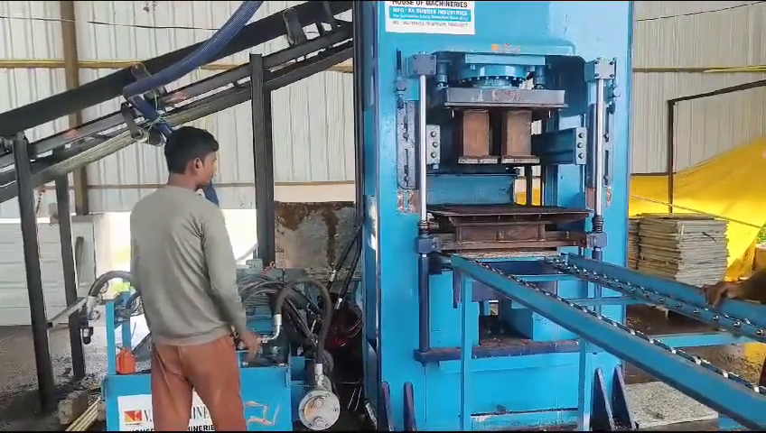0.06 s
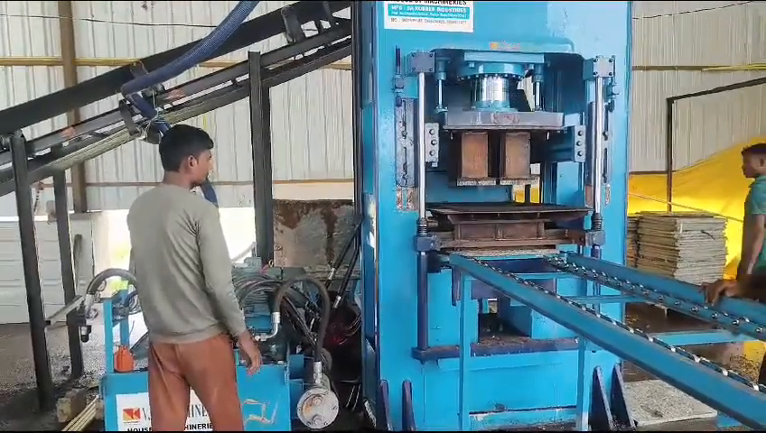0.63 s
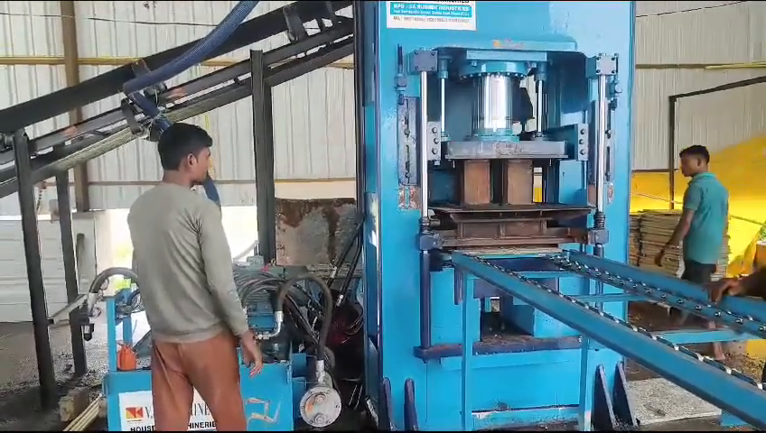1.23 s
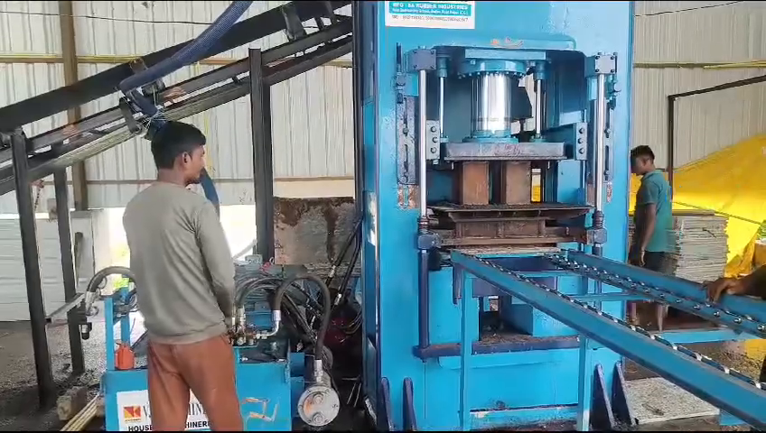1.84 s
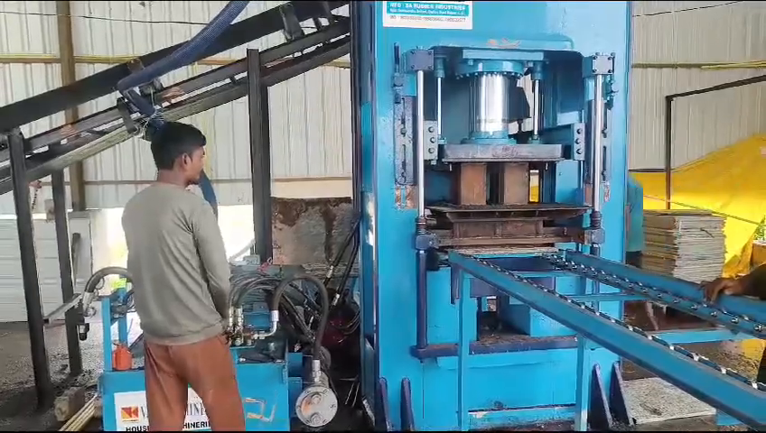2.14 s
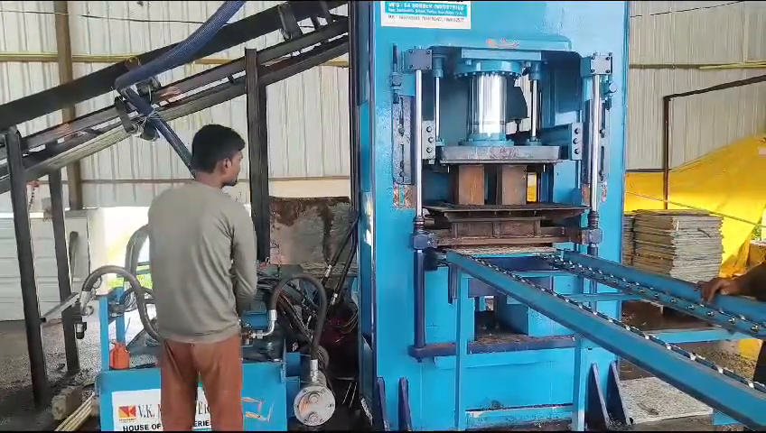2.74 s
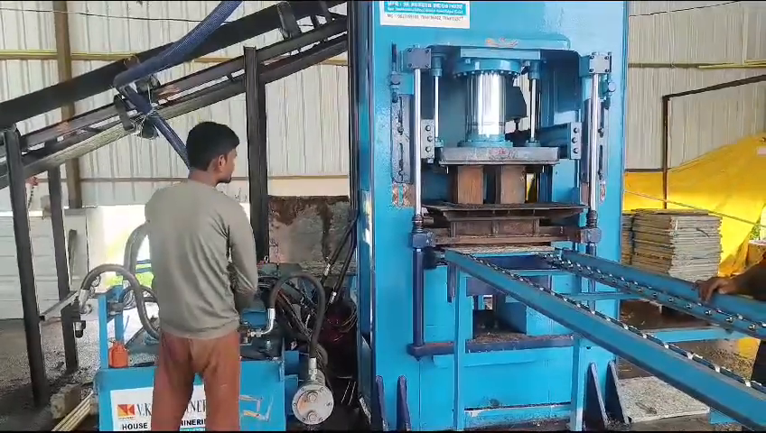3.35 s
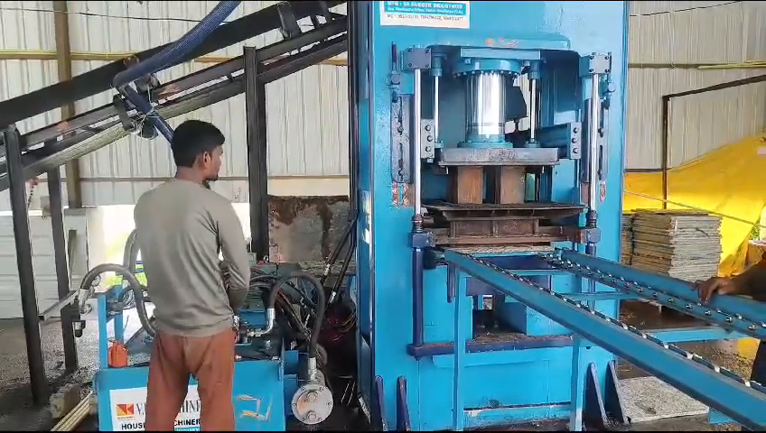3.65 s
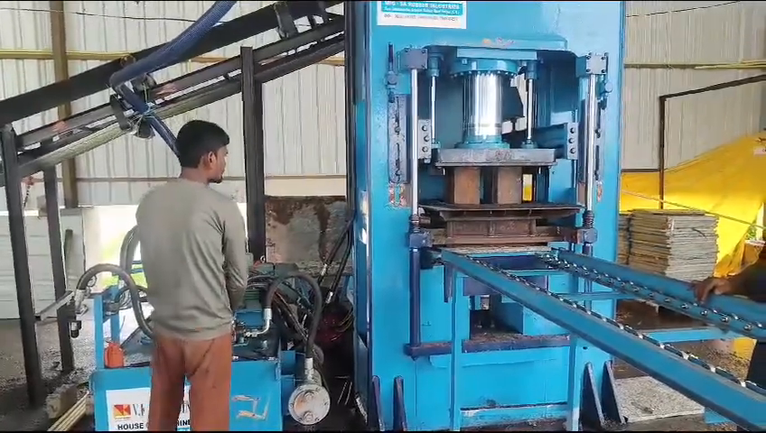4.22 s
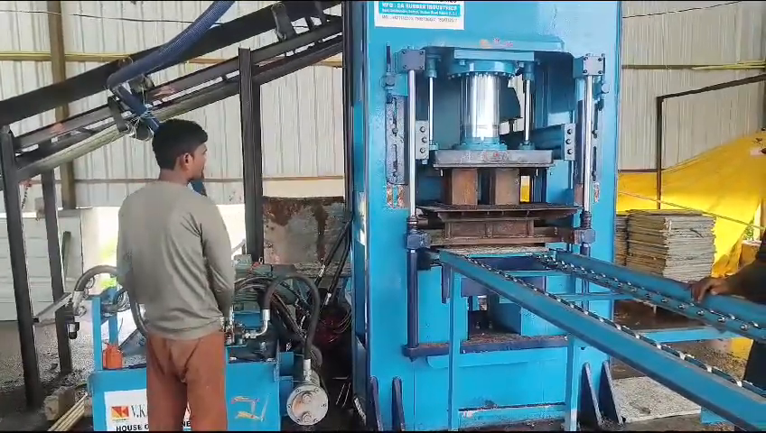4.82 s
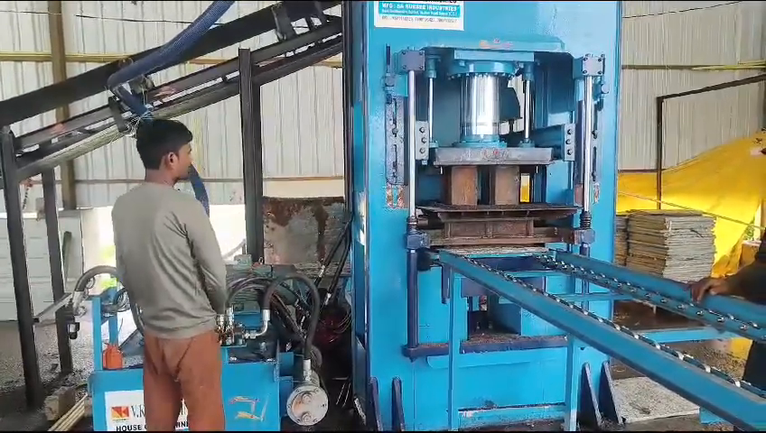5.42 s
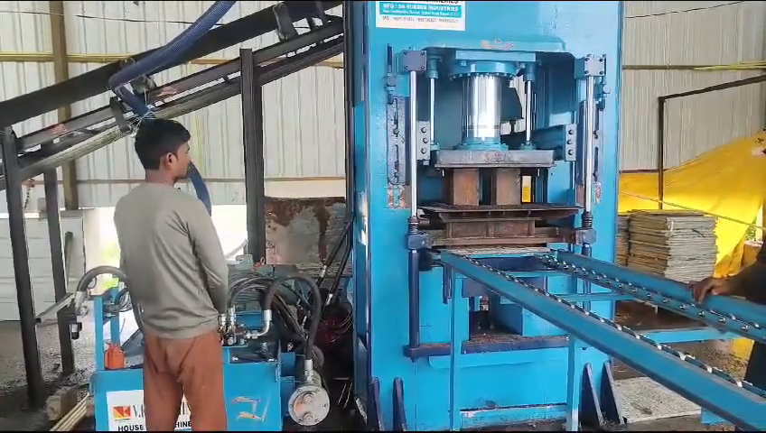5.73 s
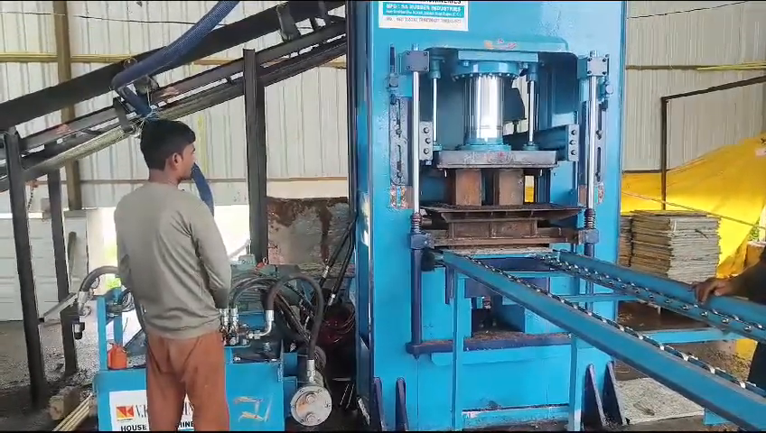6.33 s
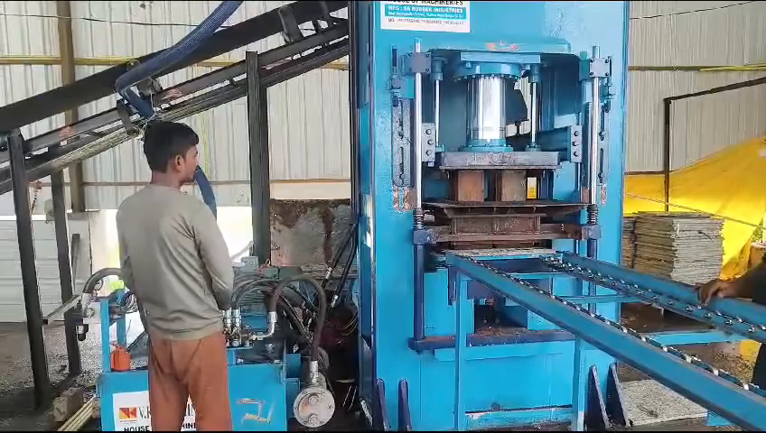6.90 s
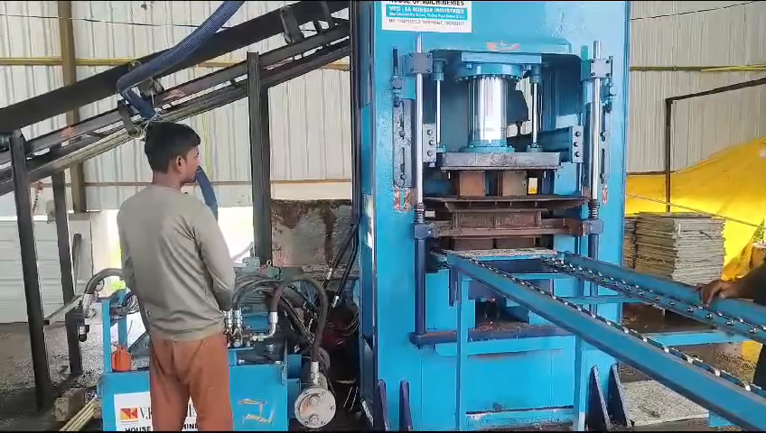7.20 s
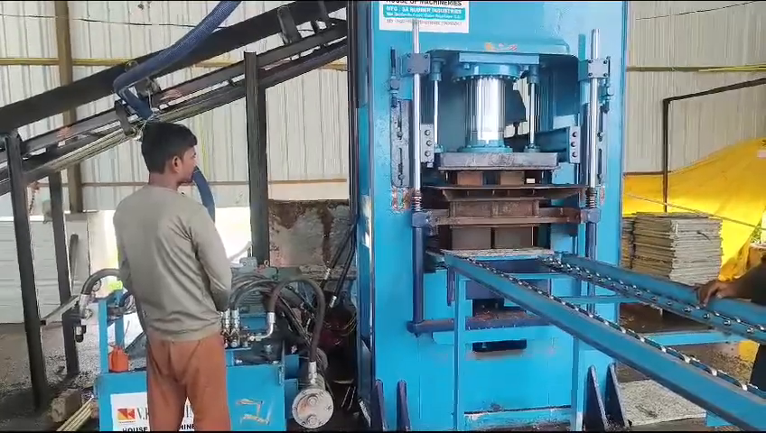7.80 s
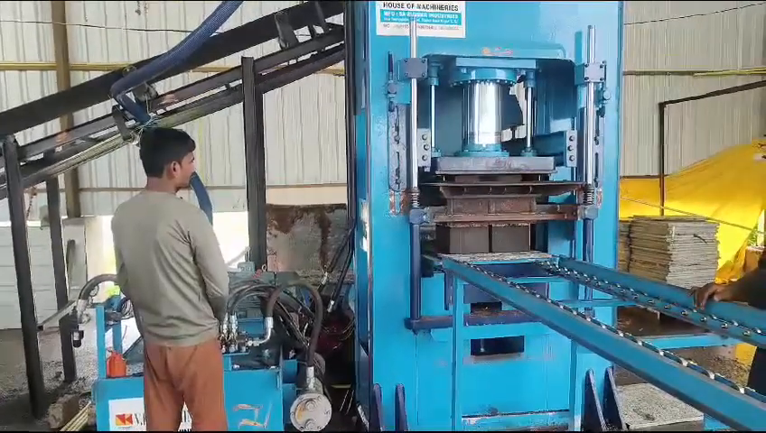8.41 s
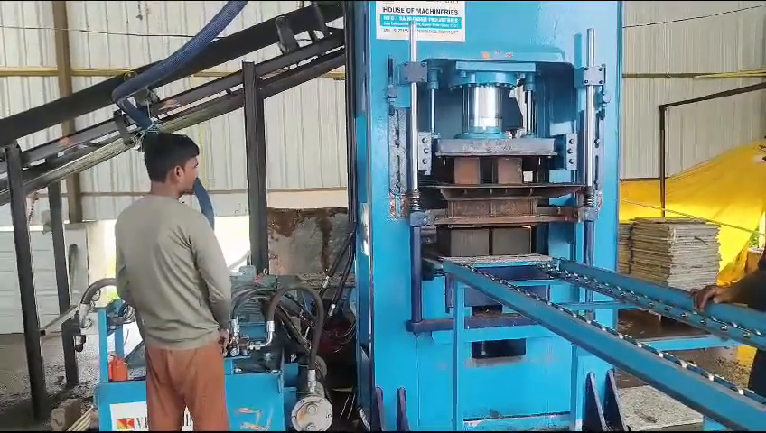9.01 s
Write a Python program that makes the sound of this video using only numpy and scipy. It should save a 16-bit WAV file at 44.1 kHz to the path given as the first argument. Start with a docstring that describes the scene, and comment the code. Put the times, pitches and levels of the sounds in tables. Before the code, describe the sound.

A hydraulic block press drones and rattles, then settles to a pump hum with rushing oil, metal clanks and sharp hammer blows.

```python
"""The vibrating table of a hydraulic block press shakes a steel mould in a sheet-metal shed.
Eccentric weights drive it into a drone and rattle, then coast to rest as the ram groans by stick-slip.
The pump's pistons hum on, and turbulent oil rushes through valves to the rams.
The mould clanks against the frame and sheds grit as it is stripped.
Elsewhere a hammer excites the modes of struck steel, and the walls reflect each blow."""
import sys
import numpy as np
from scipy import signal
from scipy.fft import rfft, irfft, next_fast_len
from scipy.io import wavfile

SR = 44100
rng = np.random.default_rng(int(sys.argv[2]) if len(sys.argv) > 2 else 0)


def unload_wav(signal):
    """Save mono or channel-first audio to the path in sys.argv[1] as 16-bit WAV at rate SR, clipped to [-1, 1]."""
    wavfile.write(
        sys.argv[1],
        SR,
        np.round(np.clip(np.atleast_2d(signal).T, -1, 1) * 32767).astype(np.int16),
    )


N = 403515
T = np.arange(N) / SR

# Levels are relative within each table; a swell's width_s is its standard deviation.
SHED_DECAY = [(60, 0.44), (300, 1), (1000, 0.76), (3000, 1), (6000, 0.84), (15000, 0.33)]  # reverberation time: frequency_hz, t60_s
BLOW_REPEATS = [(0.0135, -3.5), (0.0162, -7), (0.0195, -6.5), (0.044, -10), (0.054, -11), (0.074, -11)]  # repeats of each blow: delay_s, level_db; the first three are the hammer bouncing on the steel, the later ones reflections from near walls
SIDE_GAIN = [(30, -27), (90, -39), (180, -58), (350, -20), (700, -5), (1300, -1.5), (3000, -1)]  # weight of the side signal: frequency_hz, gain_db
EAR_TILT = [(400, 0.5), (700, 1), (1300, 2), (2400, -1), (4400, -7), (8000, 1.5), (15000, -4)]  # left-right contrast, scaled for each ear: frequency_hz, contrast_db
TREBLE_LOSS = [(6400, -1), (7200, -4), (8000, -24), (9300, -9), (10300, -14.5), (11600, -5.5),
               (15500, -9.5)]  # dull top in both ears: frequency_hz, gain_db

# hammer blows: start_s, level_db, treble_db, head_db, three rings of the spot as (pitch_hz, level_db)
HAMMER_BLOWS = [(3.322, -12.5, 6, -22, (3400, -8), (4300, -2), (7900, -13)),
                (4.033, -11, 2.5, -22, (2680, -2.3), (4000, -3), (5500, -8)),
                (6.315, -11.5, 2, -16, (3400, -2), (5500, -2), (6470, -5)),
                (7.017, -13.5, 4.5, -20, (3300, -2), (4800, -2), (6200, -1.2)),
                (7.717, -12.5, -2, -5, (3050, -1), (5200, -5), (5930, 0)),
                (8.4139, -12, 1.5, -4, (3000, -5), (4200, -2), (5740, 0))]
STEEL_MODES = [(2160, 600, 2), (2900, 1000, 2), (4260, 220, 1), (5350, 730, 5.5), (6600, 1700, 0),
               (11000, 750, 1.5), (15100, 700, 1)]  # the hammered steel: pitch_hz, width_hz, level_db
CRACK_SPECTRUM = [(300, -29), (1450, -27), (2100, 2), (3300, 9), (6500, 0.5), (10000, 2), (15500, -2.5)]  # hard steel contact: frequency_hz, level_db

FAN_LINES = [(643, 22, -45), (893, 7, -43.5), (3638, 55, -45.5)]  # the motor fan's tones: pitch_hz, width_hz, level_db
TANK_BOOMS = [(1.42, -24), (5.1, -27.5), (6.21, -24), (8.9, -35)]  # jolts to the oil tank: peak_s, level_db
RAM_STROKES = [(3.38, 4.2, .98), (4.2, 4.85, .45), (6.3, 6.7, .55), (6.7, 7.75, .78), (8.62, 9.6, .95)]  # the rams draw on the pump: start_s, end_s, load_fraction
PISTON_HARMONICS = [(1, -38, -35.5), (2, -39.5, -39.5), (3, -42.5, -44), (4, -44.5, -42.5)]  # pressure ripple: harmonic, idle_db, full_load_db
HARMONIC_SWELLS = [(3.73, .17, 1, -26), (5.68, .1, 1, -35), (6.2, .1, 1, -29), (6.58, .09, 1, -29),
                   (7.3, .3, 1, -28), (8.85, .15, 1, -31), (2.45, .2, 2, -43), (3.8, .25, 2, -38),
                   (4.42, .2, 2, -35), (6.55, .11, 2, -35), (7.57, .12, 2, -36.5), (2.75, .12, 3, -43),
                   (3.45, .24, 3, -38.5), (6.2, .1, 3, -41), (7.35, .2, 3, -38.5), (3.7, .2, 4, -45),
                   (4.6, .2, 4, -47), (9.05, .15, 4, -42)]  # swells of the hum: peak_s, width_s, harmonic, level_db
WHINE_PARTIALS = [(1283, -8), (2584, -9), (2915, -8), (3040, -8)]  # the pump's whine: full_load_pitch_hz, level_db
PRESSURE_PEAKS = [(3.98, -38.5), (6.85, -38.5)]  # a low whine stands out: peak_s, level_db
FLOW_SPECTRUM = [(100, 3), (400, 2.5), (700, -0.5), (1000, 3.5), (1500, -5.5), (1950, 3), (2300, 1.5),
                 (2600, 4.5), (3250, 1), (4000, -4.5), (4700, -5), (5700, -3), (7000, -7.5), (10000, -10),
                 (15500, -13)]  # running oil: frequency_hz, level_db
RUMBLE_SPECTRUM = [(20, -24), (60, -12), (85, -2.5), (140, 1), (220, -3.5), (350, -13.5), (600, -7.5),
                   (1000, -16), (1500, -19), (4000, -38.5)]  # the power pack: frequency_hz, level_db
FRAME_SHUDDERS = [(1.5, -32), (1.85, -23), (2.5, -30), (5.32, -26), (5.74, -29.5), (6.0, -32), (6.8, -32),
                  (8.72, -26)]  # the force on the frame shifts: peak_s, level_db
SHUDDER_SPECTRUM = [(15, -19), (35, 0), (55, -10), (85, -4.5), (130, -3.5), (400, -48)]  # the shuddering frame: frequency_hz, level_db
VALVE_OPENINGS = [(1.86, -22.5, 0.14, 0.16, -4, 3050), (2.34, -22.5, 0.049, 0.19, -6, 2450),
                  (2.78, -32.5, 0.12, 0.089, -12, 2300), (3.48, -33, 0.085, 0.35, 8, 3000),
                  (4.45, -33.5, 0.089, .16, -18, 2900), (5.592, -20.5, 0.024, 0.13, -2.5, 2070),
                  (5.85, -33.5, 0.017, 1, -3, 2790), (6.70, -27, 0.1, 0.16, 0.5, 3370),
                  (7.3, -39, 0.3, 0.6, -8, 2800), (8.209, -23, 0.03, 0.13, -10, 2750),
                  (8.96, -29, 0.11, .25, -7, 3200)]  # rushes of oil: start_s, level_db, rise_s, decay_s, churn_db, jet_hz
GUSH_SPECTRUM = [(200, -25), (1000, 13), (1500, 6), (2000, 12), (3100, 10), (4200, 5.5), (6000, 1),
                 (10000, -13), (15500, -13)]  # oil in an opening valve: frequency_hz, level_db
CHURN_SPECTRUM = [(40, -8), (150, 17.5), (300, 11.5), (600, 14.5), (1000, 4.5), (2000, -54), (5000, -44)]  # oil in the hoses: frequency_hz, level_db

GRIT_SLIDES = [(.03, 0.061, -36), (1.26, .04, -37), (1.96, .05, -38), (4.53, .05, -40), (5.92, .035, -38),
               (6.095, 0.018, -26.5), (8.25, 0.033, -29)]  # grit leaves the mould: peak_s, width_s, level_db
GRIT_SPECTRUM = [(2000, -30), (4500, 1), (7000, 1), (12000, 0), (15500, -2)]  # sliding grit: frequency_hz, level_db
FITTING_TICKS = [(0.12, -11, -15), (0.566, -19, -11), (.984, -18, -12), (5.054, -32.5, 19),
                 (5.166, -15.5, 4), (8.813, -36, 23), (9.066, -23, -7)]  # loose fittings: start_s, level_db, edge_db
# sliding steel and throttled oil: start_s, length_s, pitch_hz, width_hz, level_db
THIN_SQUEALS = [(0, 2.38, 1104, 22, -35.5), (1.455, 0.02, 1980, 400, -20), (3.5, .45, 1900, 160, -39),
                (3.535, .06, 5660, 25, -36), (3.6, .06, 5616, 25, -37), (3.6, .38, 3050, 550, -32.5),
                (6.196, .1, 2620, 90, -32), (7.76, .13, 3100, 250, -29), (8.103, 0.23, 5200, 603, -36)]
MOULD_KNOCKS = [(.04, -18, 670, -10), (1.255, -17.5, 900, -11), (1.485, -20.5, 900, -14),
                (5.037, -18, 2200, -6), (5.053, -17.5, 4520, -1), (5.071, -20, 3500, 1),
                (5.156, -20, 3500, -3), (5.164, -17.5, 4770, 1), (6.103, -23, 1200, -2),
                (8.679, -22.5, 2400, -5), (8.698, -17.5, 1400, 7), (8.712, -22.5, 1330, 11.5),
                (8.738, -16.5, 3070, 2), (8.805, -26, 3000, 6), (8.908, -26, 900, 3.5)]  # the mould hits the frame: start_s, level_db, cutoff_hz, thud_db
FRAME_MODES = [(217, 13, 3.5), (320, 79, -21), (555, 400, -6.5), (900, 61, -17), (1040, 84, -1.5),
               (1240, 80, -13), (1540, 340, -13.5), (1900, 800, -9.5), (2630, 200, -4), (3200, 180, -6)]  # the press frame: pitch_hz, width_hz, level_db
THUD_SPECTRUM = [(40, -9), (80, 12), (120, 15.5), (270, 8), (390, 6.5), (560, 6), (750, -3), (1000, -12),
                 (2000, -52)]  # the frame's base: frequency_hz, level_db
RAM_GROANS = [(.035, .15, 143, 128, -13.5), (1.185, .055, 108, 132, -17), (1.225, .155, 135, 130, -13),
              (1.49, .085, 124, 128, -16), (1.57, .08, 130, 128, -19)]  # the ram starts or bears down: start_s, length_s, start_hz, end_hz, level_db
GROAN_HARMONICS = [(1, -12), (2, 8), (3, -5.5), (4, -39), (5, -36), (6, -29)]  # the groan's timbre: harmonic, level_db
PLATE_MODES = [(1350, 81, 0.5), (1720, 31, -4.5), (2240, 74, -3), (2876, 64, -3), (3370, 63, -2.5)]  # the mould's plates: pitch_hz, width_hz, level_db
RATTLE_SPECTRUM = [(30, -22), (120, -14), (290, 6), (400, 0.5), (520, 1), (750, 0), (900, -12),
                   (1080, -3.5), (1400, -13.5), (2000, -10), (3300, -11.5), (4300, -19), (7000, -29),
                   (15000, -75)]  # the mould slaps the table: frequency_hz, level_db
# multiples of the turn rate, four for the table and the rest for the mould: harmonic, level_db
TURN_HARMONICS = [(1,-15.5), (2,-8.5), (3,-13.5), (4,-9.5), (5,-1.5), (6,-8.5), (7,-12), (8,-5.5), (9,-2.5),
                  (10,-10), (11,-3), (12,1.5), (13,-1.5), (14,-32), (15,-14), (16,-12.5), (17,-19),
                  (18,-10.5), (19,-14), (20,-15), (21,-17.5), (22,-13.5), (23,-14.5), (24,-10), (25,-24)]


def amp(db):
    """Decibels to amplitude ratio."""
    return 10 ** (np.asarray(db) / 20)


def unit(x):
    """Normalisation to rms 1."""
    return x / np.sqrt(np.mean(x ** 2) + 1e-20)


def ramp(start_s, length_s):
    """Linear rise from 0 to 1."""
    return np.clip((T - start_s) / length_s, 0, 1)


def swells(rows, width_s):
    """A Gaussian envelope around each (peak_s, level_db)."""
    return sum(amp(db) * np.exp(-.5 * ((T - peak_s) / width_s) ** 2) for peak_s, db in rows)


def read(points, hz):
    """Interpolation on a log-frequency axis."""
    frequency, value = np.transpose(points)
    return np.interp(np.log(hz + 1), np.log(frequency + 1), value)


def colour(x, points, power=1):
    """Spectral shaping by (frequency_hz, gain_db) points, the gain raised to a power."""
    size = next_fast_len(x.shape[-1] + 2048)
    gain = amp(power * read(points, np.fft.rfftfreq(size, 1 / SR)))
    return irfft(rfft(x, size) * gain, size)[..., :x.shape[-1]]


def noise(points, size=N):
    """Coloured noise of rms 1, as mid and side."""
    return unit(colour(rng.standard_normal((2, size)), points))


def drift(rate_hz):
    """Low-pass noise of rms 1, for random modulation."""
    hz = np.fft.rfftfreq(N // 64, 64 / SR)
    slow = irfft(rfft(rng.standard_normal(N // 64)) / (1 + (hz / rate_hz) ** 2))
    return unit(np.interp(T, np.linspace(0, T[-1], len(slow)), slow))


def ring(x, hz, width):
    """A second-order resonance with peak gain 1."""
    return signal.lfilter(*signal.iirpeak(hz, hz / width, SR), x)


def narrow(hz, width, size=N):
    """Narrow-band noise of rms 1, as mid and side."""
    return unit(ring(ring(rng.standard_normal((2, size)), hz, width), hz, width))


def tone(turns, waver):
    """A partial with random phase and amplitude modulation, as mid and side."""
    phase = 2 * np.pi * (turns + rng.random((2, 1))) + waver * drift(2.7)
    return np.cos(phase) * (1 + waver * drift(6.1))


def shed(x, build_s):
    """Reverberation: a diffuse field builds up and decays exponentially, each band at its own rate."""
    hz, t, bands = signal.stft(rng.standard_normal((2, SR)), SR, nperseg=256)
    bands = bands * amp(-60 * t / read(SHED_DECAY, hz)[:, None])
    tail = signal.istft(bands, SR)[1][:, :SR] * (1 - np.exp(-T[:SR] / build_s))
    return signal.fftconvolve(x, tail / np.linalg.norm(tail[0]), axes=1)[:, :N]


def add(mix, start_s, sound):
    """Superposition of a sound from start_s on."""
    part = mix[:, round(start_s * SR):][:, :sound.shape[-1]]
    part += sound[..., :part.shape[-1]]


def hammer(contact_s=.0037, attack_s=.00092, spot_width_hz=680, spot_decay_s=.004,
           head_hz=12400, head_width_hz=220, head_decay_s=.022):
    """Impact excitation: each blow cracks and rings modes set by where it lands; the hammer bounces within
    milliseconds, and near walls echo it."""
    out, t = np.zeros((2, N)), T[:SR // 5]
    for start_s, db, treble_db, head_db, *spots in HAMMER_BLOWS:
        crack = noise(CRACK_SPECTRUM, len(t)) * np.exp(-(t / contact_s) ** 2 / 2)
        steel = sum(amp(level) * ring(crack, hz, width) for hz, width, level in STEEL_MODES)
        blow = amp(-7) * crack + steel
        blow = colour(blow / np.std(blow[:, :SR // 200]), [(6000, 0), (9500, treble_db)])
        clusters = [(hz, spot_width_hz, level - 1, spot_decay_s) for hz, level in spots]
        clusters.append((head_hz, head_width_hz, head_db - 6, head_decay_s))
        for hz, width, level, decay_s in clusters:
            fade = np.exp(-t / decay_s)
            blow += amp(level) * np.std(fade) * unit(fade * narrow(hz, width, len(t)))
        add(out, start_s, amp(db - 1) * blow * (1 - np.exp(-t / attack_s)))
    echoes = np.zeros((2, N))
    for delay_s, db in BLOW_REPEATS:
        add(echoes, delay_s, amp(db) * out)
    return out + echoes + shed(out, build_s=.037)


def fan(waver_db=2.5):
    """Tonal fan noise: thin spectral lines, each fading in and out independently."""
    return sum(amp(db + waver_db * drift(.81)) * narrow(hz, width) for hz, width, db in FAN_LINES)


def tank(rest_db=-33):
    """Wall resonance: churning oil keeps the tank booming faintly; jolts make it swell."""
    return (amp(rest_db) + swells(TANK_BOOMS, width_s=.076)) * narrow(hz=263.4, width=58)


def pump_drive(idle_hz=246.7, sag_hz=4.6, ease_s=.3):
    """Speed droop under load: gives the load, the piston cycles and a clock true at full load."""
    load = sum(share * (ramp(on - ease_s / 2, ease_s) - ramp(off - ease_s / 2, ease_s))
               for on, off, share in RAM_STROKES)
    cycles = np.cumsum(idle_hz - sag_hz * load) / SR
    return load, cycles, cycles / (idle_hz - sag_hz)


def pump(swell_db=2, strain_hz=877.5, whistle_harmonic=23):
    """Pressure ripple: pistons hum in harmonics; load raises a whine and a throttling valve's whistle."""
    load, cycles, clock_s = pump_drive()
    hum = 0
    for k, idle_db, loaded_db in PISTON_HARMONICS:
        gain = amp(idle_db + (loaded_db - idle_db) * load + swell_db * drift(2.5))
        swell = sum(swells([(peak_s, db)], width_s)
                    for peak_s, width_s, harmonic, db in HARMONIC_SWELLS if harmonic == k)
        hum += (gain + swell) * unit(tone(k * cycles, waver=.1))
    whine = unit(sum(amp(db) * tone(hz * clock_s, waver=.5) for hz, db in WHINE_PARTIALS))
    strain = swells(PRESSURE_PEAKS, width_s=.25) * unit(tone(strain_hz * clock_s, waver=.1))
    whistle = unit(tone(whistle_harmonic * cycles + .25 * drift(10), waver=1.1))
    return hum + amp(-41.5 + 2 * load) * whine + strain + amp(-49 + 4.5 * load) * whistle


def power_pack(pulse_depth=.1, surge_lag_s=.15, surge_db=-12, flow_start_db=-6.5, flow_build_s=3.4):
    """Flow noise and structure-borne sound: oil hisses in pulses, the pack rumbles, the frame shudders."""
    load, cycles, _ = pump_drive()
    pulsing = 1 + pulse_depth * np.cos(2 * np.pi * cycles)
    hiss = unit(noise(FLOW_SPECTRUM) * pulsing * amp(.7 * drift(12)))
    flow = amp(-28.5 + 1.2 * load + flow_start_db * (1 - ramp(0, flow_build_s))) * hiss
    # the rumble swells just after each valve opens
    surges = [(start_s + surge_lag_s, db + surge_db) for start_s, db, *_ in VALVE_OPENINGS]
    rumble_gain = amp(-27.5 + .5 * load + .75 * drift(3)) + swells(surges, width_s=.1)
    rumble = rumble_gain * noise(RUMBLE_SPECTRUM)
    shudder = (amp(-58) + swells(FRAME_SHUDDERS, width_s=.12)) * noise(SHUDDER_SPECTRUM)
    return rumble + shudder + flow


def valves(jet_db=-13, jet_width_hz=420):
    """Jet turbulence: each opening valve gushes, rasps and dies away, with a low churn in the hoses."""
    gush = noise(GUSH_SPECTRUM) * amp(drift(43))
    churn = noise(CHURN_SPECTRUM)
    out = np.zeros((2, N))
    for start_s, db, rise_s, decay_s, churn_db, jet_hz in VALVE_OPENINGS:
        swell = np.sqrt(ramp(start_s, rise_s)) * np.exp(-np.maximum(T - start_s - rise_s, 0) / decay_s)
        jet = unit(ring(gush, jet_hz, jet_width_hz))
        out += amp(db) * swell * (gush + amp(jet_db) * jet + amp(churn_db) * churn)
    return out


def grit(flicker_db=1.5):
    """Granular friction: dry grit slides off the mould in brief, bright sizzles."""
    slides = sum(swells([(peak_s, db)], width_s) for peak_s, width_s, db in GRIT_SLIDES)
    return slides * noise(GRIT_SPECTRUM) * amp(flicker_db * drift(90))


def fittings(ring_s=.0021, edge_s=.0046, room_db=-10):
    """Damped impacts: loose steel fittings tick with a sharp edge and a brief ring."""
    out, t = np.zeros((2, N)), T[:SR // 20]
    for start_s, db, edge_db in FITTING_TICKS:
        ping = narrow(hz=5570, width=1200, size=len(t)) * np.exp(-t / ring_s)
        edge = noise(CRACK_SPECTRUM, len(t)) * np.exp(-t / edge_s)
        add(out, start_s, amp(db) * (ping + amp(edge_db - 7) * edge))
    return out + amp(room_db) * shed(out, build_s=.02)


def squeals():
    """Resonance: sliding steel and throttled oil excite one narrow band per squeal."""
    out = np.zeros((2, N))
    for start_s, length_s, hz, width, db in THIN_SQUEALS:
        size = round(length_s * SR)
        add(out, start_s, amp(db) * narrow(hz, width, size) * signal.windows.tukey(size, .4))
    return out


def clanks(crunch_rise_s=.0081, crunch_decay_s=.0098, thud_rise_s=.0046, thud_decay_s=.033, room_db=-.7):
    """Modal response to impact: the gritty mould crunches on the frame, which rings and thuds."""
    out, t = np.zeros((2, N)), T[:SR // 4]
    for start_s, db, cutoff_hz, thud_db in MOULD_KNOCKS:
        contact = np.exp(-t / crunch_decay_s) * (1 - np.exp(-t / crunch_rise_s))
        crunch = rng.standard_normal((2, len(t))) * contact
        frame = sum(amp(level) * ring(crunch, hz, width) for hz, width, level in FRAME_MODES)
        body = signal.sosfilt(signal.butter(4, cutoff_hz, fs=SR, output="sos"), amp(-8) * crunch + frame)
        thud = noise(THUD_SPECTRUM, len(t)) * np.exp(-t / thud_decay_s) * (1 - np.exp(-t / thud_rise_s))
        add(out, start_s, amp(db) * (body / np.std(body[:, :SR // 100]) + amp(thud_db) * thud))
    return out + amp(room_db) * shed(out, build_s=.0011)


def ram_groans(roughness=.15):
    """Stick-slip friction: the ram catches in its guides and sounds short, low, gliding tones."""
    out = np.zeros((2, N))
    for start_s, length_s, start_hz, end_hz, db in RAM_GROANS:
        size = round(length_s * SR)
        slips = np.cumsum(np.linspace(start_hz, end_hz, size)) / SR
        voice = sum(amp(level) * np.cos(2 * np.pi * (k * slips + rng.random((2, 1))))
                    for k, level in GROAN_HARMONICS)
        rough = 1 + roughness * drift(60)[:size]
        add(out, start_s, amp(db) * unit(voice * rough) * signal.windows.tukey(size, .57))
    return out


def plate_buzz(turns, decay_turns=.3):
    """Periodic excitation: the mould's plates chatter once a turn, each mode fluttering on its own."""
    chatter = rng.standard_normal((2, N)) * np.exp(-(turns % 1) / decay_turns)
    return unit(sum(amp(db + drift(10)) * unit(ring(ring(chatter, hz, width), hz, width))
                    for hz, width, db in PLATE_MODES))


def mould_rattle(turns, alike=.53, band_hz=(680, 1400)):
    """Quasi-periodic impacts: the mould's slaps are part repeated each turn, part fresh noise."""
    one_turn = rng.standard_normal((2, 1024))
    repeated = one_turn[:, (turns % 1 * one_turn.shape[1]).astype(int)]
    repeated = signal.sosfilt(signal.butter(2, band_hz, "band", fs=SR, output="sos"), repeated)
    slaps = colour(alike * repeated + (1 - alike) * rng.standard_normal((2, N)), RATTLE_SPECTRUM)
    return unit(slaps * (1 + .068 * np.cos(2 * np.pi * turns)) * amp(drift(25)))


def vibrating_table(start_hz=40.5, pressing_hz=42.67, free_hz=43.05, spin_up_s=.08,
                    grip_s=.11, release_s=1.176, switch_off_s=1.53, coast_s=.9, settle_db_per_s=9):
    """Forced vibration: eccentric weights shake the pressed mould, run free, then coast to rest."""
    gripped, released = ramp(grip_s, .083), ramp(release_s, .022)
    speed = np.exp(-np.maximum(T - switch_off_s, 0) / coast_s)  # fraction of the driven rate
    driven_hz = pressing_hz + (start_hz - pressing_hz) * np.exp(-T / spin_up_s)
    driven_hz += (free_hz - pressing_hz) * released
    turns = np.cumsum(driven_hz * speed) / SR
    # power laws of speed: the tones fall steeply as the table slows, the rattle gently
    swing_gain = amp(-21) * (1 - np.exp(-T / .082)) * speed ** 6.6
    drone_gain = amp(-19.5 + 9.5 * (gripped - released)) * speed ** 6.5
    rattle_gain = amp(-15 - settle_db_per_s * np.maximum(T - release_s, 0)) * speed ** .62
    partials = [amp(db) * tone(k * turns, waver=.065) for k, db in TURN_HARMONICS]
    swing = swing_gain * unit(sum(partials[:4]))
    drone = drone_gain * unit(sum(partials[4:]))
    rattle = rattle_gain * mould_rattle(turns)
    buzz = amp(-29.5) * gripped * (1 - ramp(release_s, .17)) * plate_buzz(turns)
    running = 1 - ramp(start_s=2.04, length_s=.62)
    return running * (swing + drone + rattle + buzz)


def ears(source, left_lead_s):
    """Interaural time difference: mid and side become left and right, long waves nearly alike in both."""
    mid, side = source[0], colour(source[1], SIDE_GAIN)
    right = np.interp(T - round(left_lead_s * SR) / SR, T, mid - side)
    return np.array([mid + side, right])


def scene():
    """Localisation by arrival time: the press is ahead; the hydraulics and the hammer are to the left."""
    ahead = vibrating_table() + ram_groans() + squeals() + clanks() + fittings() + grit()
    aside = pump() + fan() + tank() + power_pack() + valves() + hammer()
    return ears(ahead, left_lead_s=0) + ears(aside, left_lead_s=.00034)


def record(dry, band_limit_hz=15950):
    """Filtering and saturation: unequal ears, a dull top, a soft limit near full scale, a band limit."""
    tilted = np.array([colour(dry[0], EAR_TILT, power=.51), colour(dry[1], EAR_TILT, power=-.63)])
    dulled = colour(tilted, TREBLE_LOSS)
    limited = dulled / (1 + dulled ** 8) ** (1 / 8)
    low_pass = signal.firwin(511, band_limit_hz, window=("kaiser", 9), fs=SR)
    return signal.oaconvolve(limited, low_pass[None], "same")


dry = scene()
out = record(dry)
unload_wav(out)
```